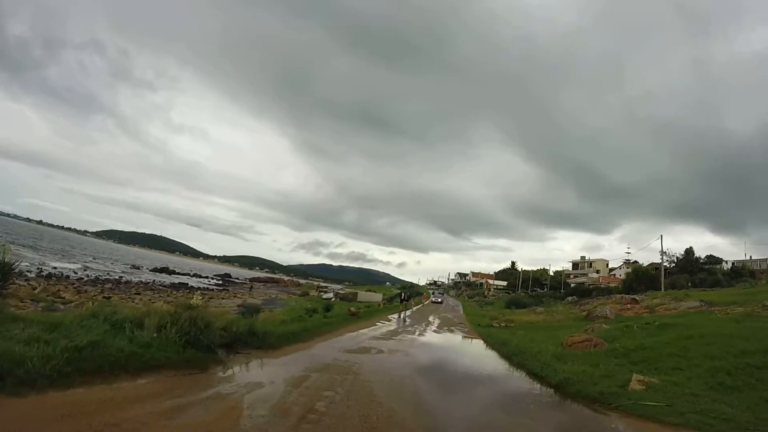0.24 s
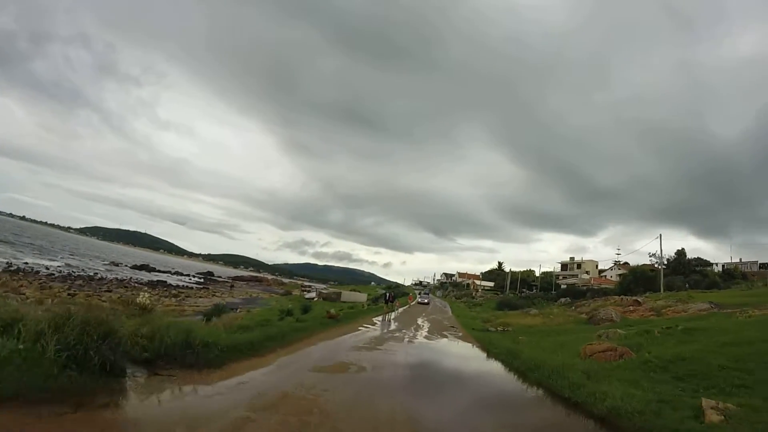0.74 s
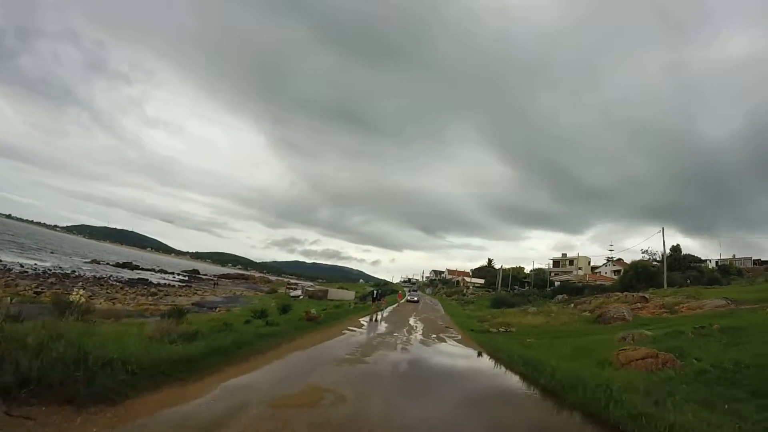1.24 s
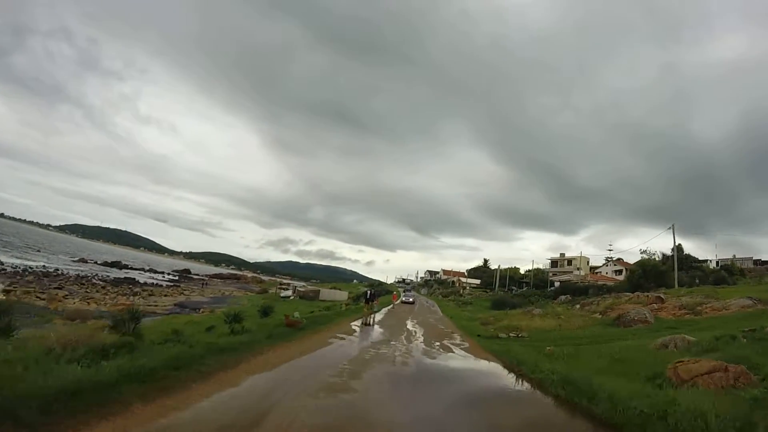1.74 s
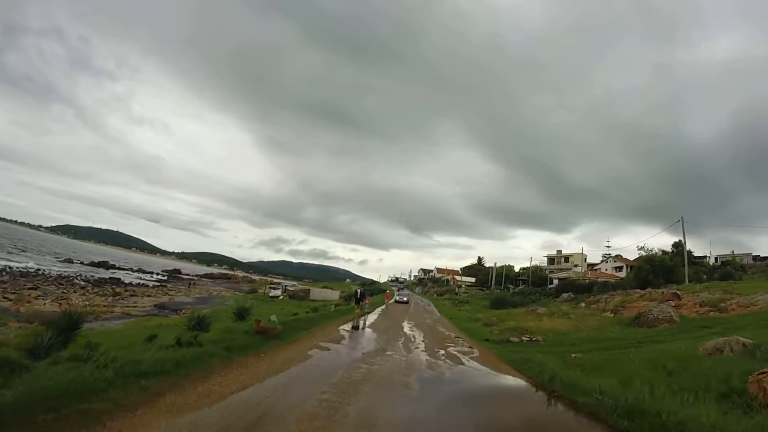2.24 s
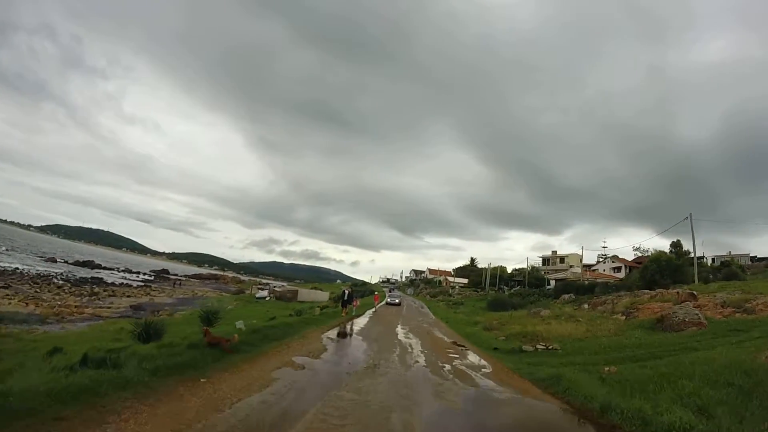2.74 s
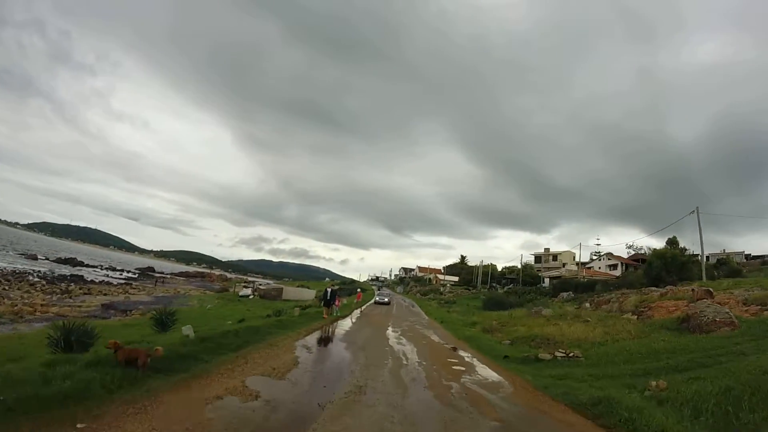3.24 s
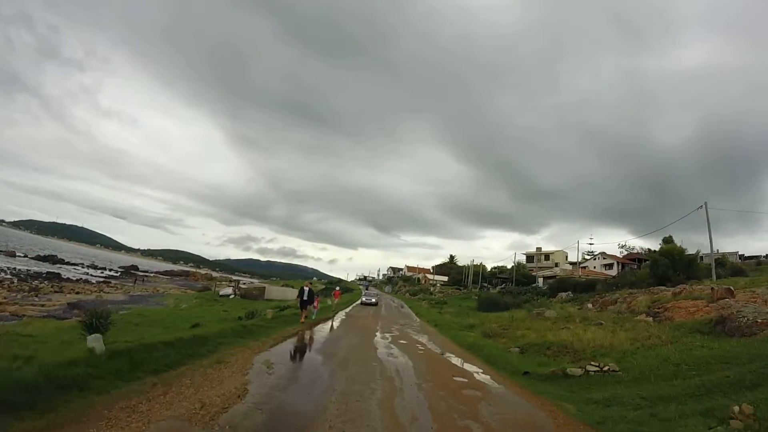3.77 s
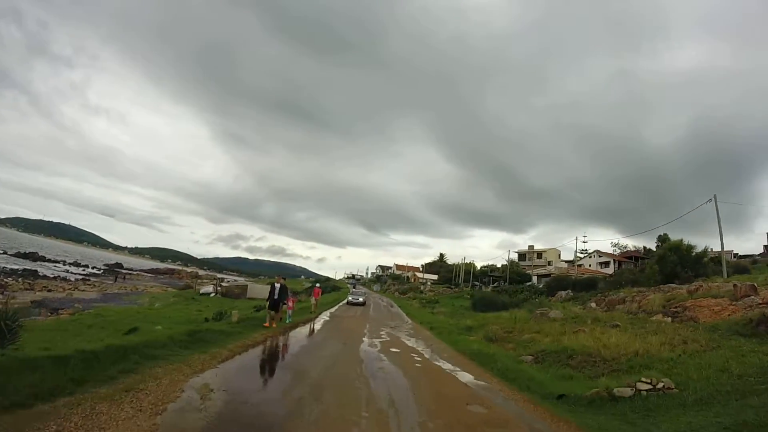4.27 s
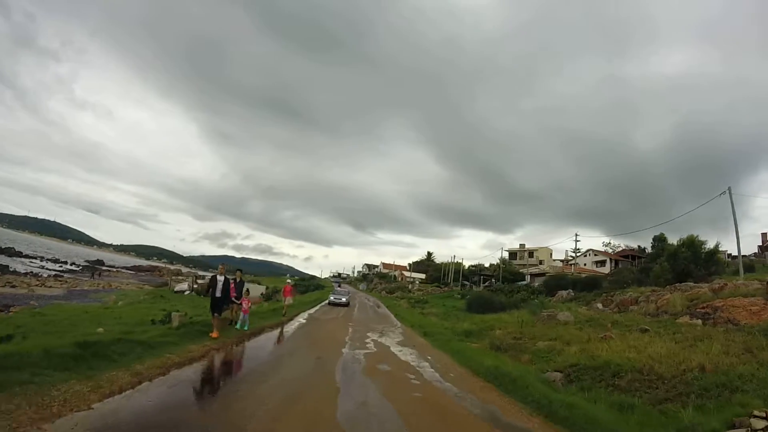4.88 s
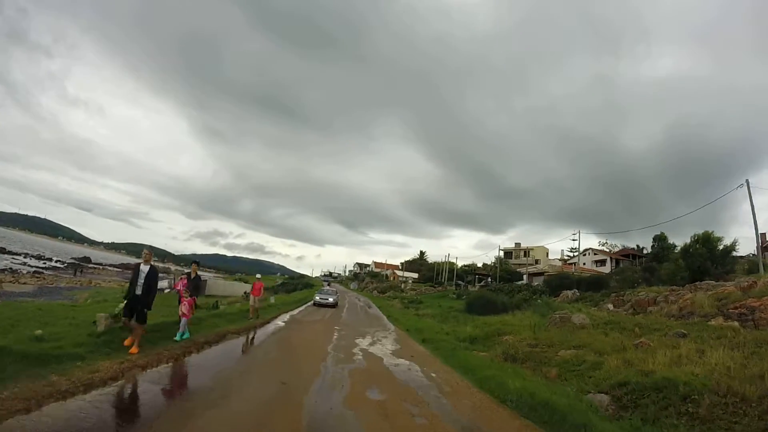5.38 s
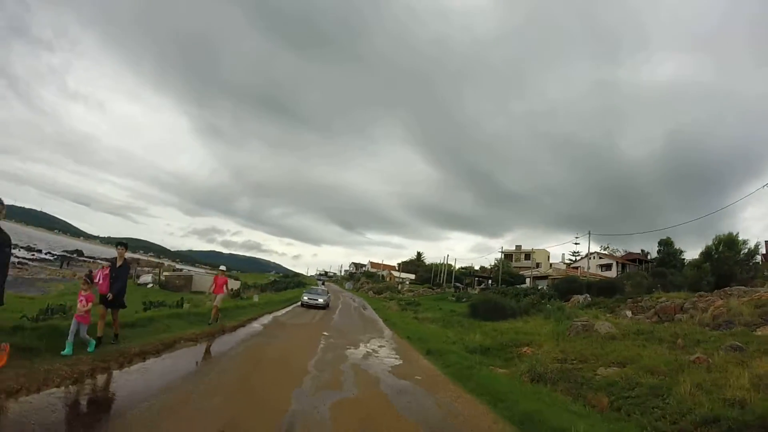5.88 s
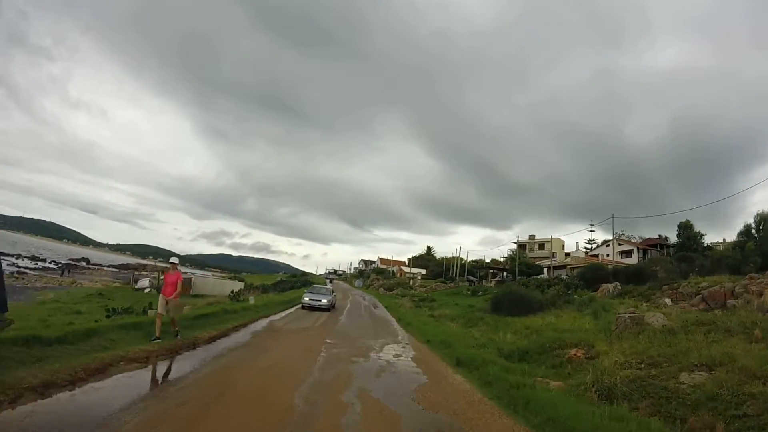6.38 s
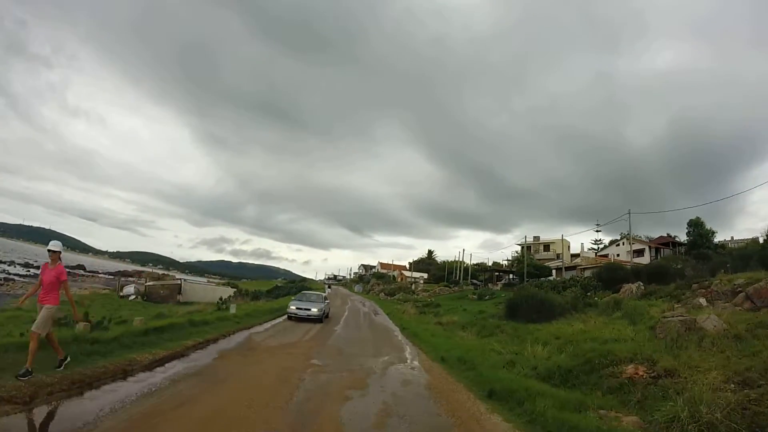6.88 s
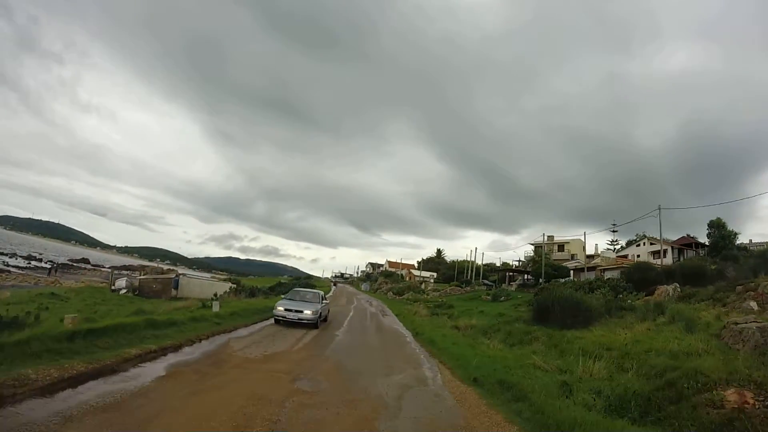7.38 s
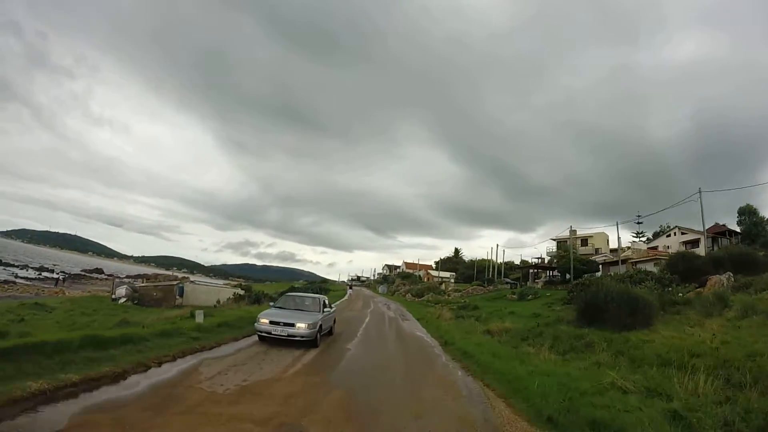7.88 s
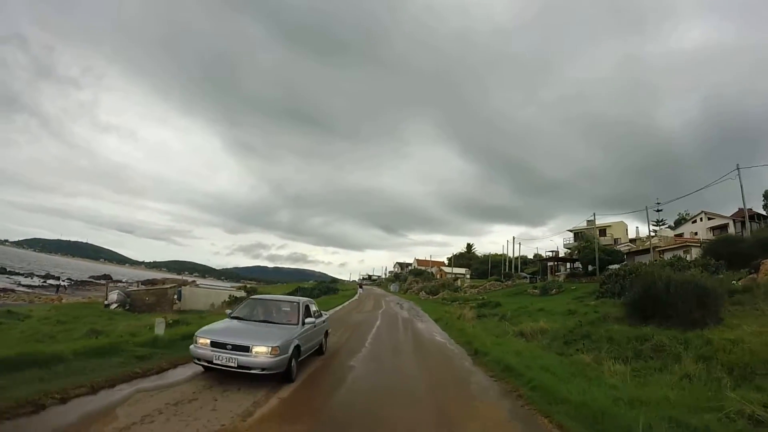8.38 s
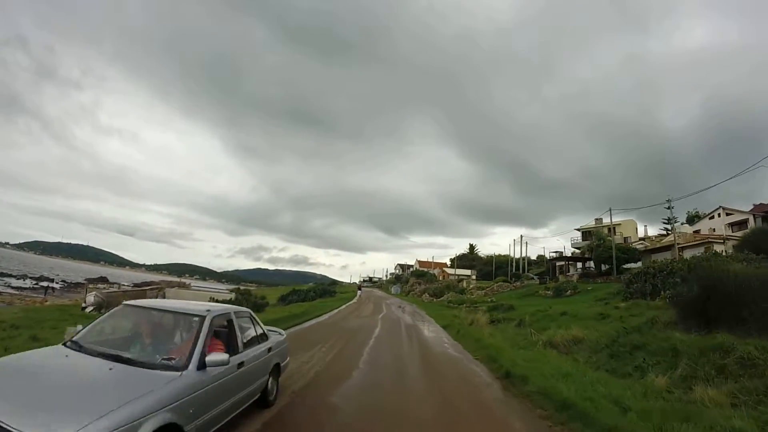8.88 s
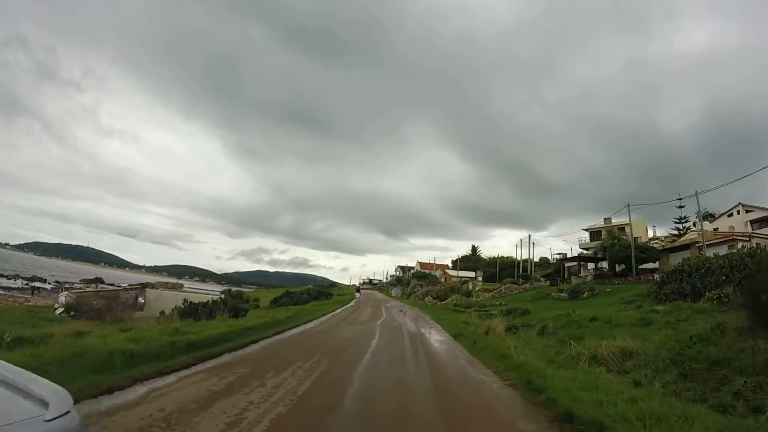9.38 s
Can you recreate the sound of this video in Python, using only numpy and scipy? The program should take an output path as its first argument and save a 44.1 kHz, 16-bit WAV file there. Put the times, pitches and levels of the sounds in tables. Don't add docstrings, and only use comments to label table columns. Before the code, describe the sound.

A microphone sealed in a plastic housing rides on a car over a wet dirt road. Throughout, a deep boom around 80 to 90 Hz swells and slips above heavy body rumble, with dulled tyre roar and quiet crackling spray behind. At 0-0.3 s, thick jolts and quick plastic clacks hit. From 0.6 to 2.7 s dry creaks and rubbing come in flurries, strongest near 2; two very faint bird chirps fall near 1.4 and 1.7. It is calmer around 3-4, then a small metallic stone tick at 4.1. Creaks return near 4.5. From 5.3 to 6.2 bumps thump and the housing snaps hard, with a faint chirp at 6. More knocks at 6.7 and 7.15, tiny rubber squeaks at 7.2-7.6, and the hardest snap and jolt at 8.06, with light rattling taps. Low booming thickens from 8.4; another car's soft hiss passes late, brightest near 9.4, with creaks, before an abrupt end.

```python
import sys
import numpy as np
from scipy import signal
from scipy.fft import rfft, irfft, next_fast_len
from scipy.io import wavfile
from scipy.ndimage import uniform_filter1d, map_coordinates

SR = 44100
rng = np.random.default_rng(int(sys.argv[2]) if len(sys.argv) > 2 else 0)


def master(y):
    cut = np.clip(np.atleast_2d(y).T, -1, 1)
    pcm = np.round(cut * 32767)
    wavfile.write(sys.argv[1], SR, pcm.astype(np.int16))


def to_linear_factor(level_db):
    exponent = np.asarray(level_db, float) / 20
    return 10 ** exponent


N = 424241

# t/s, length/s, start f/Hz, end f/Hz, level/dB
BIRD_CHIRPS = [
    (1.36, .06, 4200, 4400, -63),
    (1.715, .055, 4520, 4680, -61),
    (5.965, .095, 3030, 2970, -52),
]
# t/s, length/s, start f/Hz, end f/Hz, level/dB
RUBBER_SQUEAKS = [
    (7.16, .05, 1330, 1300, -59),
    (7.205, .07, 1290, 1330, -57),
    (7.6, .08, 1320, 1300, -56),
    (7.53, .03, 3050, 3080, -57),
]
# t/s, level/dB
WETNESS = [(0, -67.5), (.25, -71.5), (.55, -66), (.85, -61.5), (1.26, -60.5), (1.65, -61.5), (2.0, -61),
           (2.38, -63.5), (2.76, -61), (3.1, -64.5), (3.86, -61.5), (4.18, -64), (4.42, -59), (4.65, -62.5),
           (5.25, -63.5), (6.1, -62), (6.99, -63.5), (7.5, -60.5)]
# middle t/s, level/dB, half length/s, brightness/dB
HISS_SWELLS = [
    (7.978, -61, 0.18, -1.5),
    (8.598, -62.5, 0.42, -0.5),
    (9.429, -57.5, .25, 2.5),
]
# f/Hz, density/dB per Hz
ROAR_SPECTRUM = [(150, -35), (260, -7), (372, -8.5), (410, -8), (472, -8), (606, -10), (753, -11.5),
                 (906, -13), (1050, -12.5), (1200, -11), (1270, -7), (1650, -10.5), (2430, -15),
                 (3480, -12), (4520, -39.5), (7660, -120)]
# f/Hz, density/dB per Hz
SPRAY_SPECTRUM = [(2800, -36), (3700, -4), (4100, -4), (4600, -3.5), (5300, -3.5), (6200, -5), (6900, -15),
                  (8500, -27), (11000, -37.5)]
# f/Hz, density/dB per Hz
MIST_SPECTRUM = [(5500, -29.5), (7000, 5.5), (9000, 0), (11000, -2), (14000, -9), (15000, -19.5),
                 (16500, -38)]
# f/Hz, width/Hz, level/dB
CLAMP_MODES = [(2432, 280, 3.5), (2920, 520, 0.5), (3540, 370, -3.5), (1340, 940, -13)]
# t/s, level/dB
CREAKS = [(0.058, -52), (0.23, -68.11), (0.61, -45.5), (0.75, -47.5), (0.85, -52.5), (1.27, -43.5),
          (1.4, -47.5), (1.5, -46.5), (2.53, -44), (3.19, -55), (3.299, -50), (3.75, -54), (6.79, -51.5),
          (6.88, -51), (7.54, -49.6), (8.08, -54), (9.13, -49), (9.22, -47.65), (9.36, -45)]
# middle t/s, level/dB, half length/s
RUBBING = [(1.08, -57.5, 0.34), (1.64, -45.19, 0.12), (2.02, -40, 0.14), (2.37, -47, 0.07),
           (2.7, -46.35, 0.11), (3.82, -55.5, 0.27), (4.45, -42.5, 0.071), (4.87, -49, 0.095),
           (5.59, -44, 0.07), (5.76, -46.5, 0.08), (6.02, -55, 0.36), (7.93, -52, 0.21), (8.52, -54, 0.12),
           (9.34, -53, 0.25)]
# t/s, level/dB
STONE_HIT = (4.0905, -25.5)
# f/Hz, level/dB, t60/s
BRACKET_MODES = [(705, -13, 0.012), (1198, 0.5, 0.01), (1790, -14, 0.15), (1740, -1.5, .015),
                 (2620, -7, 0.026), (3230, -10, 0.022), (4297, -9, 0.0072), (5620, -9.5, 0.008)]
# t/s, level/dB
COARSENESS = [(0, -25.5), (.42, -28), (.9, -24), (1.8, -27.5), (2.7, -30), (3.6, -28.5), (4.2, -23.5),
              (5.2, -25), (6.3, -21.5), (6.9, -25.5), (7.7, -24), (8.5, -19), (9.62, -24)]
# t/s, heave level/dB, drone level/dB
POTHOLES = [(.06, -13, -28), (.15, -15.5, -30), (2.3, -35, -29), (3.7, -33, -31), (4.3, -25, -34),
            (5.3, -22, -31.5), (5.54, -18, -23.5), (5.88, -21, -21), (6.2, -26, -24.5), (6.38, -19.5, -30),
            (7.17, -16.5, -18.5), (7.45, -24.5, -35), (7.9, -22, -27), (8.82, -21, -24), (9.45, -29, -30.5)]
# f/Hz, density/dB per Hz
HEAVE_SPECTRUM = [(12, -50), (20, -19.5), (30, -8.5), (46, -5.5), (58, -9.5), (68, -4), (85, -23),
                  (150, -100)]
# f/Hz, density/dB per Hz
DRONE_SPECTRUM = [(55, -35), (72, -5.5), (100, 2.5), (118, -7), (140, -0.5), (156, -9), (168, -15),
                  (205, -18), (235, -28), (300, -41.5), (400, -55.5)]
# f/Hz, level/dB, t60/s
SHELL_DULL = [(455, -8, .045), (650, -7, .028), (930, -13, .02)]
SHELL_MIDDLE = [(1360, -7, .022), (1950, -2, .011), (2190, -4, .016), (2580, -9, .026)]
SHELL_BRIGHT = [(3150, -20, 0.022), (3680, -13.5, 0.013), (5120, -16, 0.012), (6300, -23.5, 0.0067),
                (8500, -38.5, .003)]
# t/s, peak level/dB, dull part/dB, bright part/dB, rattle/dB
HARD_SNAPS = [
    (0.0387, -16, -7, -2, -17),
    (0.1237, -25, 2, -2, -14),
    (1.8895, -23.5, -14, 3, -20),
    (5.4081, -13, 2.5, -3.5, -18),
    (5.8515, -9.5, -0.5, -2, -21),
    (6.069, -16, 4.5, -3, -8),
    (6.6652, -16, -5, -5, -17),
    (7.131, -21.5, -8, -1.5, -16),
    (8.0628, -7.5, 0, -1.5, -18),
]
# t/s, peak level/dB, dull part/dB, bright part/dB
LIGHT_TAPS = [(0.083, -28.5, 4, 3.5), (0.1064, -31.5, -6, 6), (0.1996, -34, 4, -7), (0.2286, -31.5, -2, -5),
              (0.2816, -31.5, 3, -2), (0.5226, -35, -9, 6), (0.853, -32, -1, 0), (0.9043, -33, -6, 7.5),
              (1.384, -33, -4, 2.5), (2.126, -29.5, -8, 4), (4.347, -30.5, -6, 2), (5.9192, -29.5, 5, -4),
              (5.959, -32.5, 13, 3), (7.8794, -30, -9, -1), (8.1129, -28, -4, 8), (8.1923, -29.5, -8, 5),
              (8.2818, -32, -11, 17), (6.084, -28, -1, -6), (0.0514, -27.5, -3, -6), (8.4898, -30.5, -1, 4),
              (9.1356, -32, -14, 4), (9.1935, -31.5, -13, 0)]
# t/s, peak level/dB, f/Hz, t60/s, knock/dB
JOLTS = [(0.031, -22.5, 116, 0.07, -20), (0.134, -5.5, 146, 0.075, -6), (0.197, -10.5, 114, 0.21, -26),
         (0.284, -23, 116, 0.061, -28), (5.329, -15, 116, 0.099, -30), (5.397, -11.5, 123, 0.16, -31),
         (5.549, -37, 134, 0.087, -36), (5.846, -13.5, 115, 0.11, -24), (5.902, -18, 134, 0.12, -24),
         (5.957, -13, 119.5, 0.13, -38), (6.06, -26, 118, 0.07, -14), (6.12, -17, 115.5, 0.057, -26),
         (6.188, -20, 116, 0.085, -45), (6.9, -22.5, 115.4, 0.037, -29), (7.155, -14, 137.6, 0.2, -45),
         (7.706, -17, 116, 0.11, -41), (8.056, -6.5, 115, 0.1, -40)]
# t/s, f/Hz
MOUNT_RESONANCE = [(0.0, 79.5), (0.83, 88.33), (2.95, 89.38), (3.32, 82.8), (3.43, 88.6), (4.23, 91.53),
                   (5.12, 80.2), (5.22, 87.13), (5.81, 84.4), (5.92, 90.36), (6.21, 84.6), (6.88, 92.47),
                   (7.18, 81.4), (7.66, 90.1), (9.54, 89.52), (9.62, 87.1)]
# t/s, level/dB
STONE_KICKS = [(0.01, -28), (0.071, -17.5), (0.32, -17), (0.56, -16.5), (0.801, -11.5), (0.91, -11),
               (3.75, -11), (4.11, -17.5), (4.2, -21.5), (4.75, -17), (5.22, -23), (5.32, -10),
               (5.41, -12.5), (6.13, -11.5), (6.21, -14), (6.87, -20.95), (6.97, -14), (7.15, -31),
               (7.61, -13), (8.06, -10.5), (8.15, -8), (8.27, -10.5), (8.81, -10.42)]
# middle t/s, level/dB, half length/s
ROAD_RIPPLES = [(0.16, -19.66, 0.06), (1.1, -10.5, 0.07), (1.4, -8, 0.056), (1.57, -12.5, 0.049),
                (1.89, -13.5, 0.15), (2.33, -20, 0.091), (2.6, -16, 0.049), (3.11, -21, 0.19),
                (3.55, -23, 0.11), (3.94, -19.5, 0.09), (4.46, -14.5, 0.15), (4.94, -13, 0.073),
                (5.59, -19, 0.11), (5.92, -15.5, 0.12), (6.32, -11, 0.037), (6.53, -17.5, 0.23),
                (7.32, -18.5, 0.2), (7.87, -12, 0.099), (8.43, -9, 0.065), (8.66, -9.5, 0.072),
                (8.89, -10.5, 0.068), (9.18, -12, 0.16), (9.6, -13, 0.074)]


def unit(x):
    return x / np.sqrt(np.mean(x ** 2) + 1e-20)


def along(points, hz):
    f, v = np.transpose(points)
    return np.interp(np.log(hz + 1), np.log(f + 1), v, left=-120, right=-120)


def curves(rows):
    s, *cols = np.transpose(rows)
    return [np.interp(np.arange(N) / SR, s, c) for c in cols]


def wobble(knots_per_s):
    knots = rng.standard_normal(int(N * knots_per_s / SR) + 4)
    return map_coordinates(knots, [np.arange(N) * knots_per_s / SR])


def swells(rows, floor_db):
    power = to_linear_factor(2 * floor_db) * np.ones(N)
    for s, db, half_s in rows:
        start = max(round((s - 4 * half_s) * SR), 0)
        end = min(round((s + 4 * half_s) * SR), N)
        near = np.arange(start, end)
        power[near] += to_linear_factor(2 * db) * np.exp(-((near / SR - s) / half_s) ** 2)
    return 10 * np.log10(power)


def filtered(x, response):
    m = next_fast_len(N + SR // 2)
    return irfft(rfft(x, m) * response(np.fft.rfftfreq(m, 1 / SR)), m)[..., :N]


def shaped(x, spectrum):
    return unit(filtered(x, lambda hz: to_linear_factor(along(spectrum, hz))))


def rush(spectrum, patchy_db):
    z = signal.stft(rng.standard_normal(N), nperseg=512)[2]
    field = uniform_filter1d(rng.standard_normal(z.shape), size=6, axis=0)
    field = uniform_filter1d(field, size=8, axis=1)
    noise = signal.istft(z * to_linear_factor(patchy_db * unit(field)), nperseg=512)[1][:N]
    return shaped(noise, spectrum)


def ticks(per_second, spread_db):
    chance, size, sign = rng.random((3, N))
    height = to_linear_factor(-spread_db * np.log(size + 1e-3))
    return (chance < per_second / SR) * height * np.sign(sign - .5)


def ringing(modes, t, rise_s):
    scatter_db = .8 * rng.standard_normal(len(modes))
    after = np.maximum(t, 0)
    ring = 0
    for (hz, db, t60_s), chance_db in zip(modes, scatter_db):
        ring = ring + to_linear_factor(db + chance_db - 60 * after / t60_s) * np.cos(2 * np.pi * hz * t)
    return ring * np.exp(-.5 * (np.minimum(t, 0) / rise_s) ** 2)


def glides(rows):
    out = np.zeros(N)
    for s, length_s, start_hz, end_hz, db in rows:
        u = np.linspace(0, 1, round(length_s * SR))
        hz = start_hz + (end_hz - start_hz) * np.sqrt(u)
        phase = 2 * np.pi * np.cumsum(hz) / SR
        out[round(s * SR):][:len(u)] += to_linear_factor(db + 4) * np.sin(np.pi * u) * np.sin(phase)
    return out


def bird():
    return glides(BIRD_CHIRPS)


def squeaks():
    return glides(RUBBER_SQUEAKS)


def air():
    wet_db, = curves(WETNESS)
    mean_db = wet_db.mean()
    swing_db = wet_db - mean_db
    roar_floor_db = mean_db + 11.5 + 0.82 * swing_db
    mist_floor_db = mean_db - 8.5 + 0.8 * swing_db
    spray_db = swells([(s, db, half_s) for s, db, half_s, _ in HISS_SWELLS], wet_db)
    roar_db = swells([(s, db + 4.5 - bright_db, half_s) for s, db, half_s, bright_db in HISS_SWELLS], roar_floor_db)
    mist_db = swells([(s, db - 8.5 + bright_db, half_s) for s, db, half_s, bright_db in HISS_SWELLS], mist_floor_db)
    gust = wobble(12)
    drops = ticks(900, spread_db=2.2)
    roar = rush(ROAR_SPECTRUM, patchy_db=1.5)
    spray = rush(SPRAY_SPECTRUM, patchy_db=1.5) + 0.62 * shaped(drops, SPRAY_SPECTRUM)
    mist = rush(MIST_SPECTRUM, patchy_db=1.4) + 0.1 * shaped(drops, MIST_SPECTRUM)
    out = to_linear_factor(roar_db + 0.58 * gust) * roar
    out += to_linear_factor(spray_db + 0.63 + 0.56 * gust) * spray
    out += to_linear_factor(mist_db + 0.65 * gust + 0.96 * wobble(30)) * mist
    return out


def clamp_response(hz):
    total = 0
    for k, (centre_hz, width_hz, db) in enumerate(CLAMP_MODES):
        loss = 1j * hz * width_hz
        total = total + (-1) ** k * to_linear_factor(db) * loss / (centre_hz * centre_hz - hz * hz + loss)
    return total / (1 + (hz / 3900) ** 12) / (1 + (1100 / (hz + 1)) ** 4)


def creak():
    creak_half_s, rub_over_spray_db = .025, 3.5
    rows = [(s, db, creak_half_s) for s, db in CREAKS] + list(RUBBING)
    db = swells(rows, curves(WETNESS)[0] + rub_over_spray_db)
    slips = ticks(1600, spread_db=3.0) * to_linear_factor(1.2 * wobble(60) + 1.5 * wobble(14))
    return to_linear_factor(db + 0.77) * unit(filtered(slips, clamp_response))


def pebble():
    out, t = np.zeros(N), np.arange(SR // 4) / SR - .001
    s, db = STONE_HIT
    out[round(s * SR):][:len(t)] = to_linear_factor(db) * ringing(BRACKET_MODES, t, rise_s=.0002)
    return out


def road():
    lurch_half_s = 0.044
    coarse_db, = curves(COARSENESS)
    drone_floor_db = -31.5 + .35 * (coarse_db - coarse_db.mean())
    heave_db = swells([(s, db, lurch_half_s) for s, db, _ in POTHOLES], coarse_db - 0.5)
    drone_db = swells([(s, db, lurch_half_s) for s, _, db in POTHOLES], drone_floor_db)
    heave = to_linear_factor(heave_db - 2.0 + 2.0 * wobble(6)) * rush(HEAVE_SPECTRUM, patchy_db=0.1)
    drone = to_linear_factor(drone_db + 4.5 + 0.63 * wobble(9)) * rush(DRONE_SPECTRUM, patchy_db=2.5)
    return heave + drone


def snaps():
    out, t = np.zeros(N + SR), np.arange(SR // 8) / SR - .0012
    rows = [(*row, 0.043) for row in HARD_SNAPS]
    rows += [(*row, -8, 0.1) for row in LIGHT_TAPS]
    for s, db, dull_db, bright_db, rattle_db, rattle_t60_s in rows:
        ring = ringing(SHELL_MIDDLE, t, rise_s=0.00038)
        ring += to_linear_factor(dull_db) * ringing(SHELL_DULL, t, rise_s=0.00012)
        ring += to_linear_factor(bright_db) * ringing(SHELL_BRIGHT, t, rise_s=0.00016)
        ring /= np.abs(ring).max()
        chatter = rng.standard_normal(len(t)) * to_linear_factor(-60 * t / rattle_t60_s)
        rattle = signal.fftconvolve(chatter, ring[:130])[:len(t)]
        rattle /= np.abs(rattle).max()
        out[round(s * SR):][:len(t)] += to_linear_factor(db + 1.8) * (ring + to_linear_factor(rattle_db) * rattle)
    return filtered(out[:N], lambda hz: 1 / (1 + (hz / 9000) ** 6))


def bumps():
    out, t = np.zeros(N + SR), np.arange(SR // 4) / SR - .004
    knock_modes = list(SHELL_DULL[:2]) + [(1210, -16.5, 0.011)]
    for s, db, hz, t60_s, knock_db in JOLTS:
        jolt = ringing([(hz, 0, t60_s), (1.4 * hz, -7, t60_s)], t, rise_s=0.0017)
        knock = to_linear_factor(knock_db) * ringing(knock_modes, t, rise_s=0.0013)
        out[round(s * SR):][:len(t)] += to_linear_factor(db - 4.0) * (jolt + knock)
    return out[:N]


def mount():
    kick_half_s, smooth_road_db = .025, -31.5
    hz, = curves(MOUNT_RESONANCE)
    rows = [(s, db, kick_half_s) for s, db in STONE_KICKS] + list(ROAD_RIPPLES)
    db = swells(rows, smooth_road_db)
    phase = 2 * np.pi * np.cumsum(hz) / SR + 1.05 * wobble(18)
    swing = unit((1 + 0.19 * wobble(16)) * np.sin(phase))
    return to_linear_factor(db + 0.08) * swing


def scene():
    background = bird() + squeaks() + air()
    fittings = creak() + pebble() + snaps()
    ride = road() + bumps() + mount()
    return (background + fittings + ride)[None]


def low_pass(x):
    return signal.sosfilt(signal.butter(12, 15650, fs=SR, output="sos"), x)


def record(dry):
    faded = dry * np.clip((N - np.arange(N)) / 120, 0, 1)
    mix = faded / (1 + np.abs(faded / 1.07) ** 6) ** (1 / 6)
    return low_pass(mix)


dry = scene()
out = record(dry)
master(out)
```